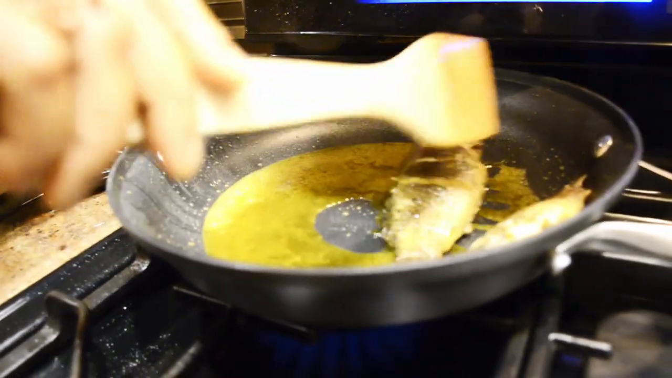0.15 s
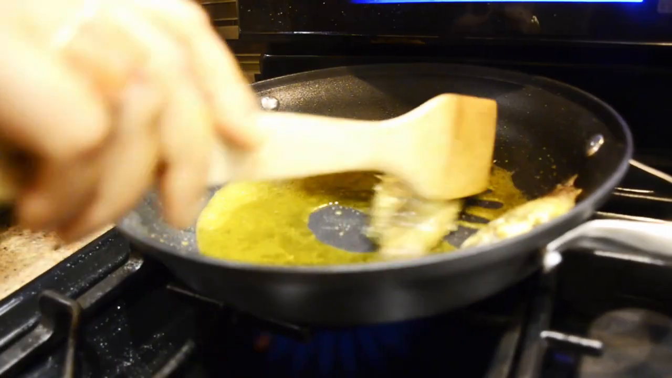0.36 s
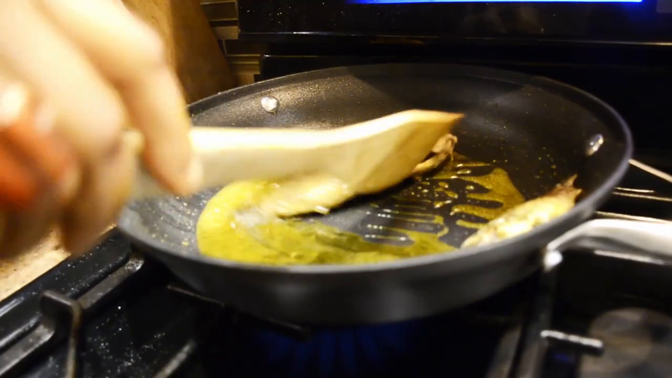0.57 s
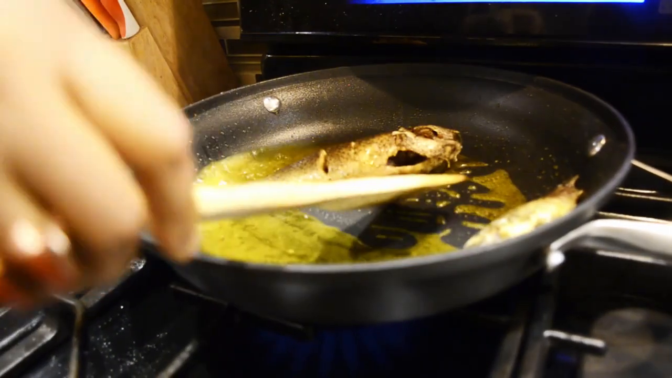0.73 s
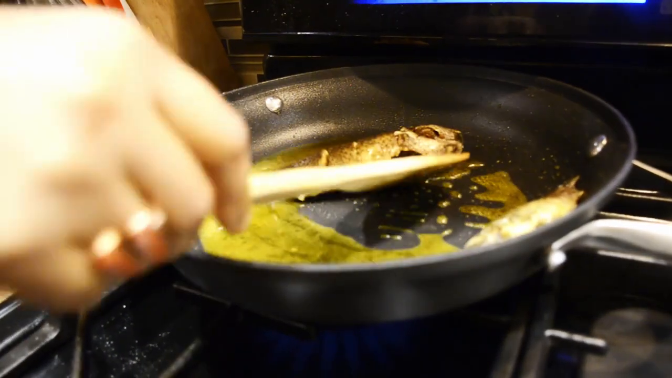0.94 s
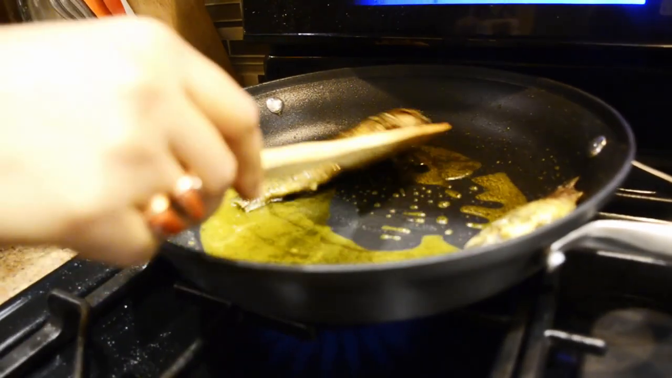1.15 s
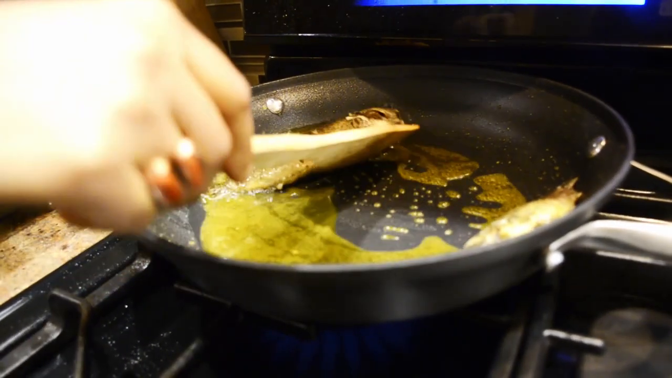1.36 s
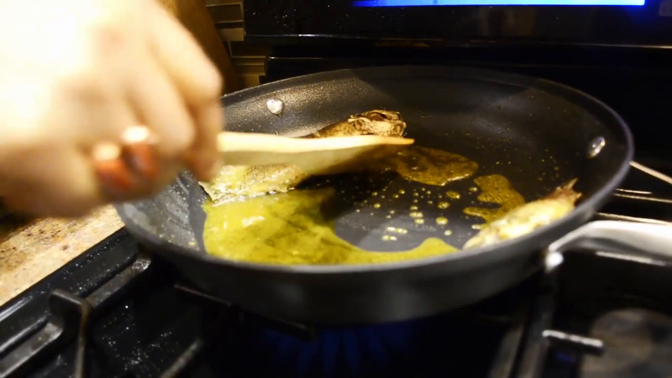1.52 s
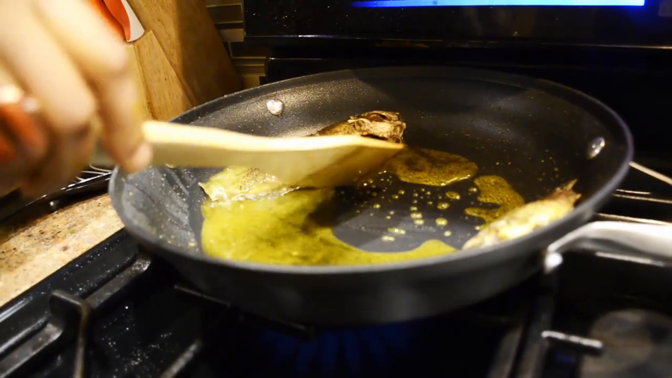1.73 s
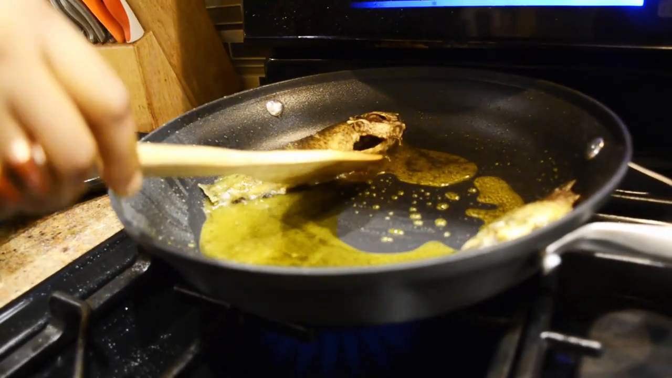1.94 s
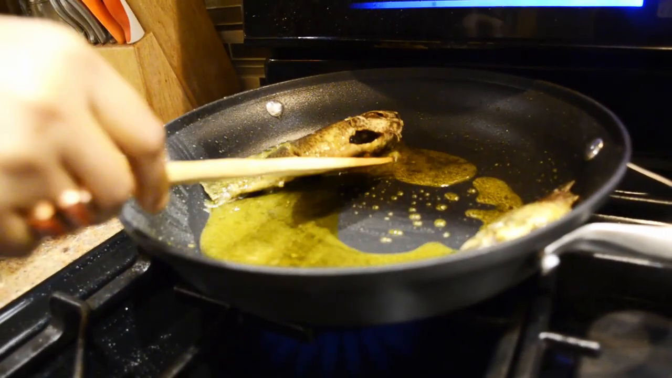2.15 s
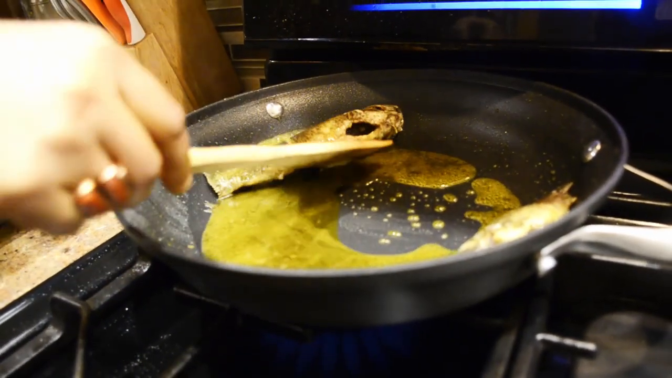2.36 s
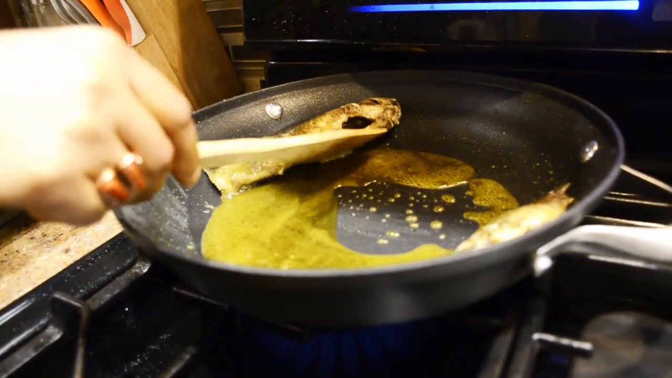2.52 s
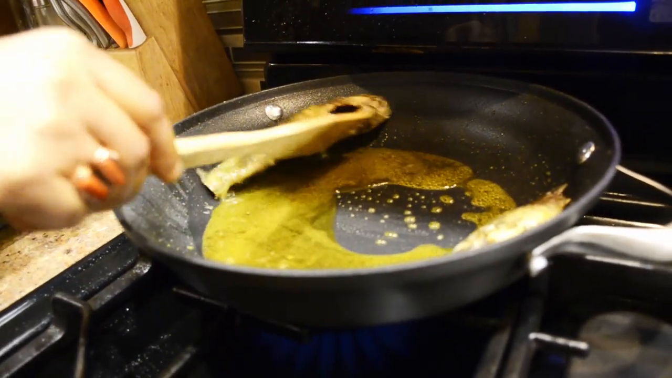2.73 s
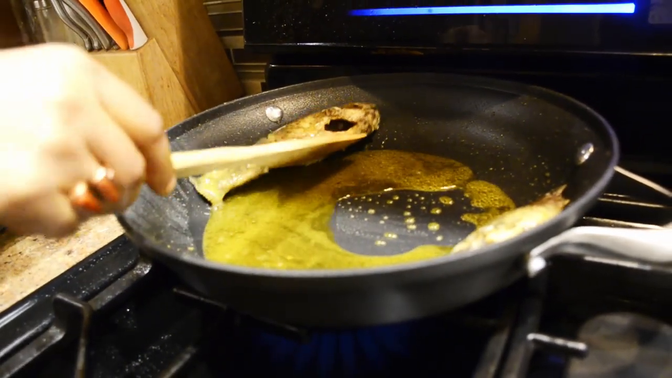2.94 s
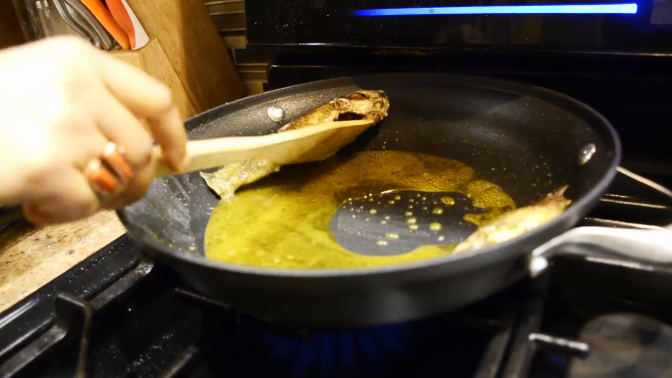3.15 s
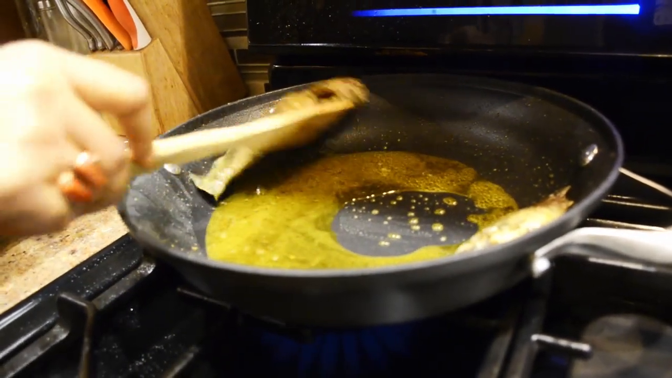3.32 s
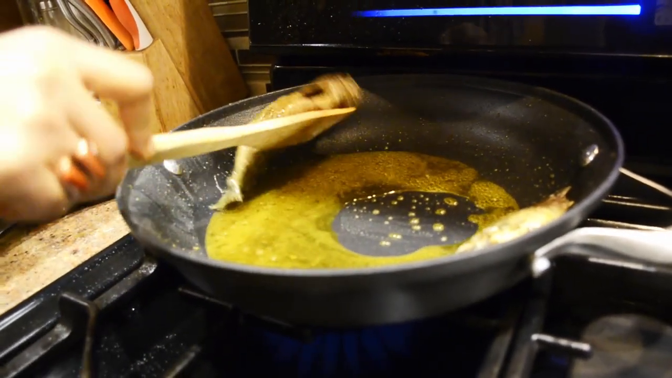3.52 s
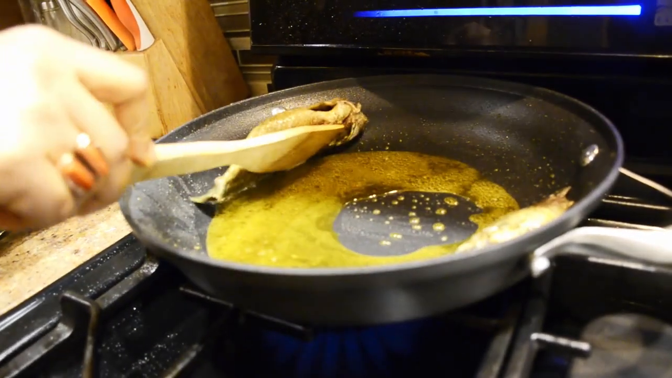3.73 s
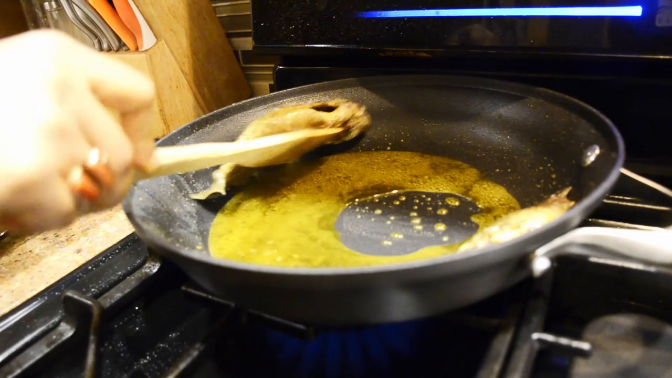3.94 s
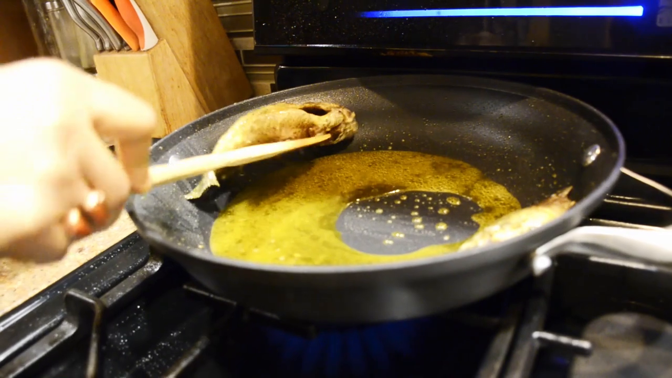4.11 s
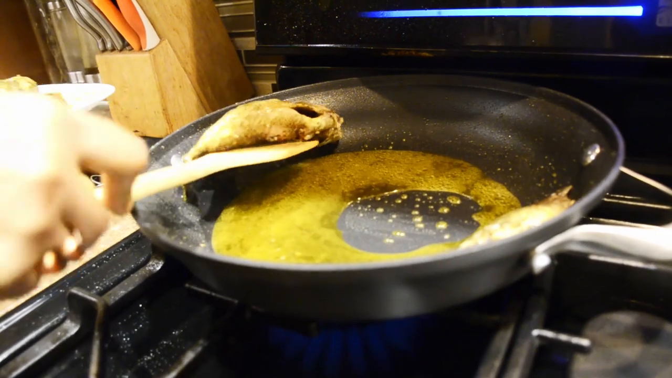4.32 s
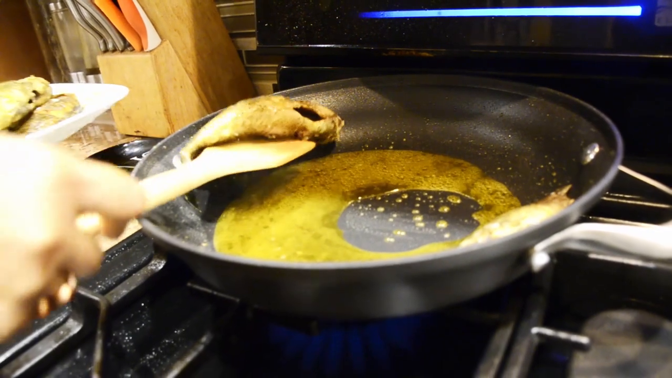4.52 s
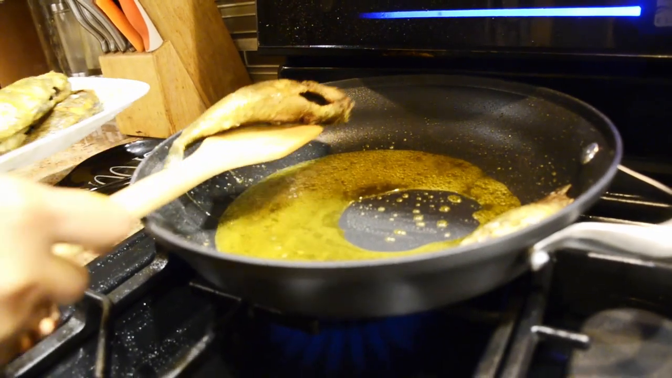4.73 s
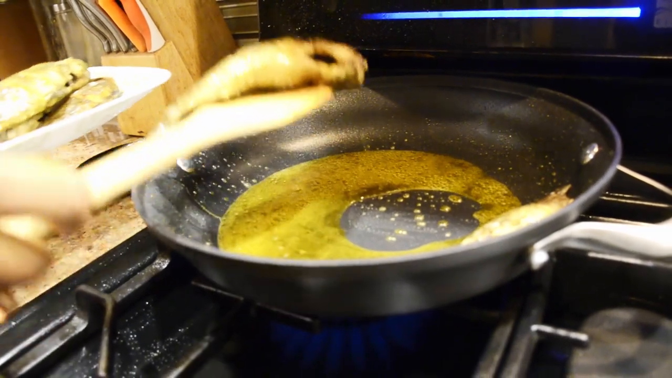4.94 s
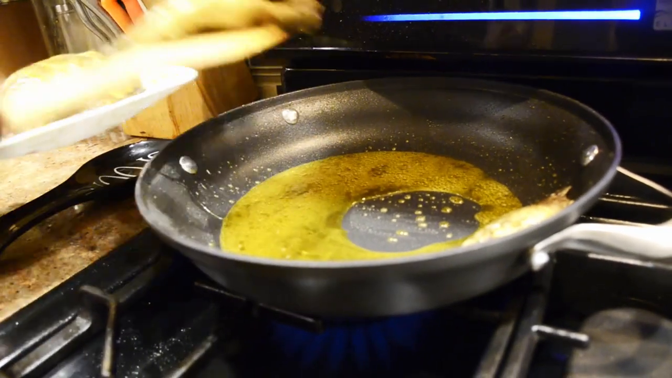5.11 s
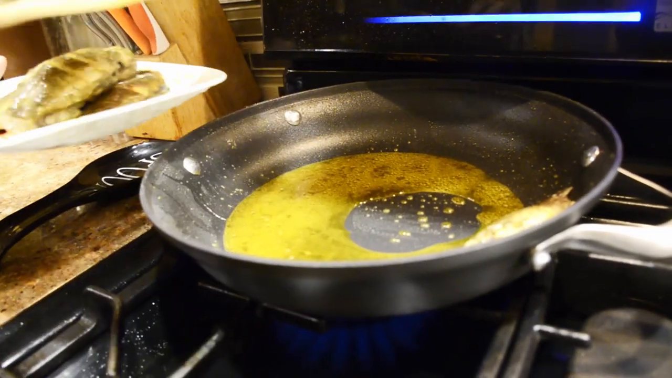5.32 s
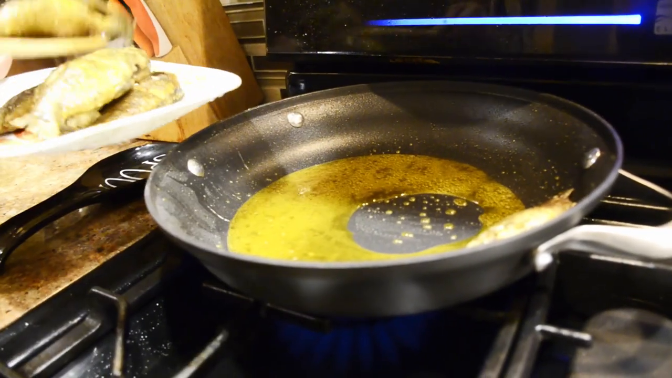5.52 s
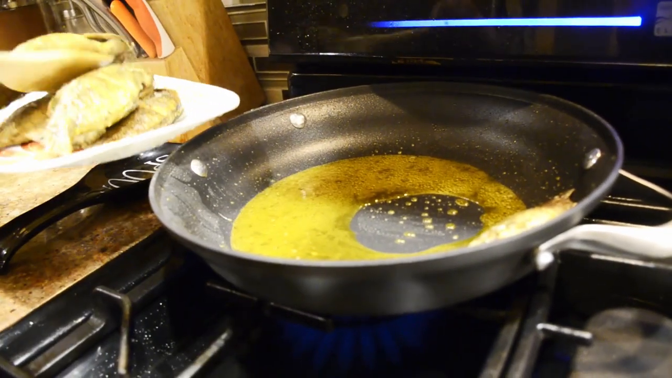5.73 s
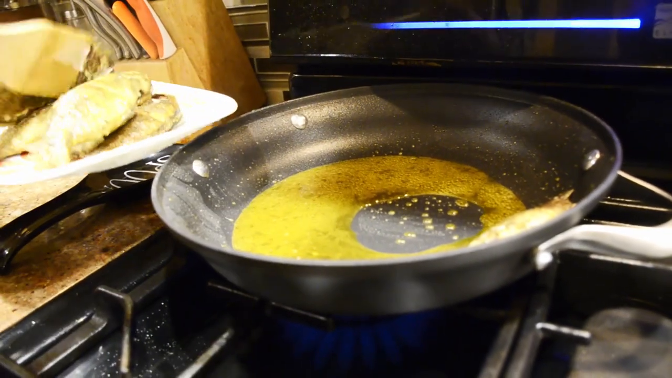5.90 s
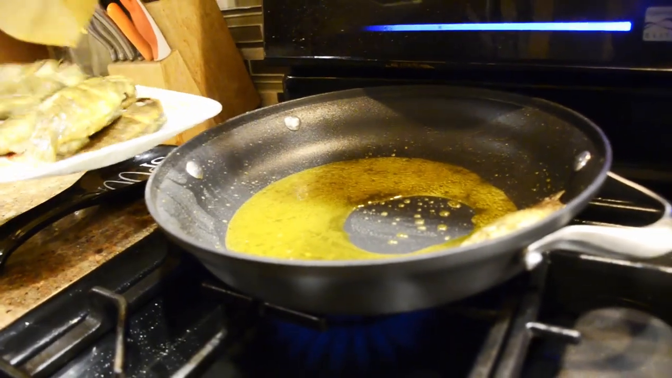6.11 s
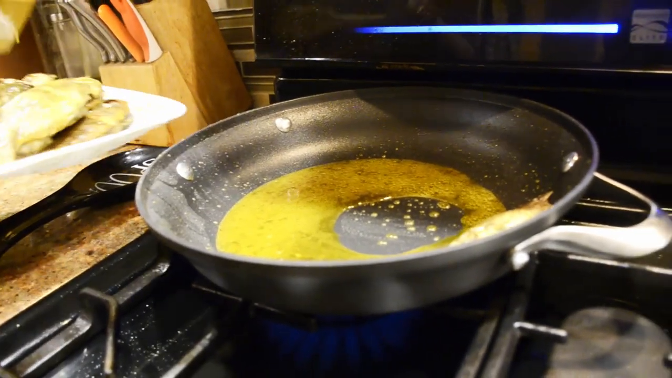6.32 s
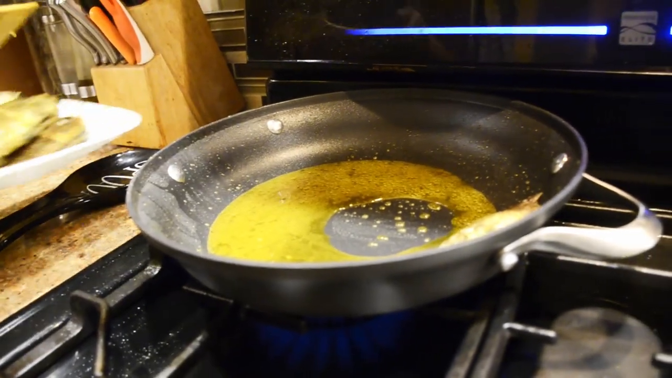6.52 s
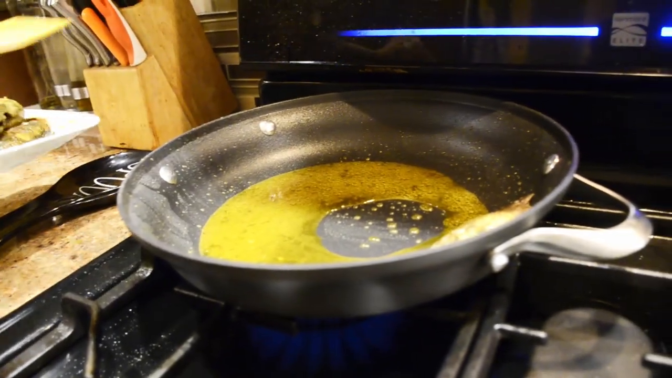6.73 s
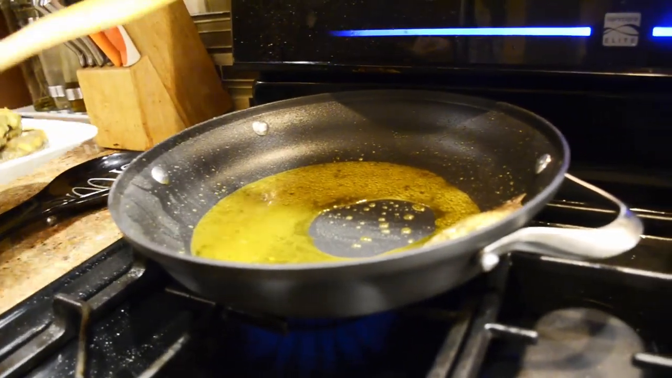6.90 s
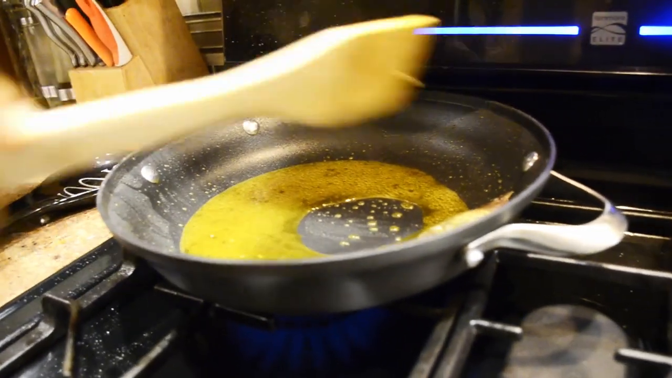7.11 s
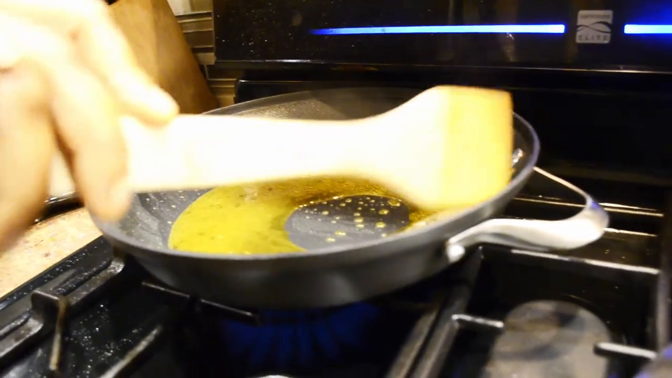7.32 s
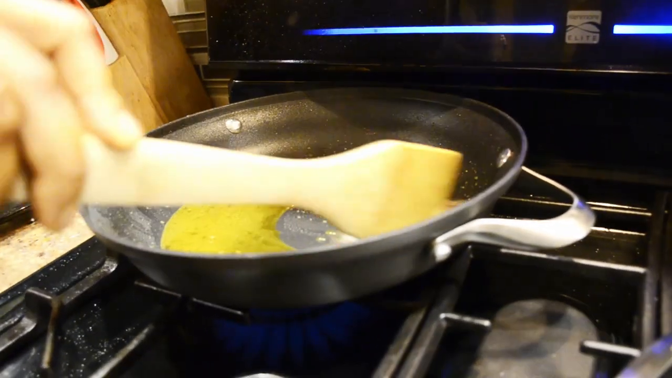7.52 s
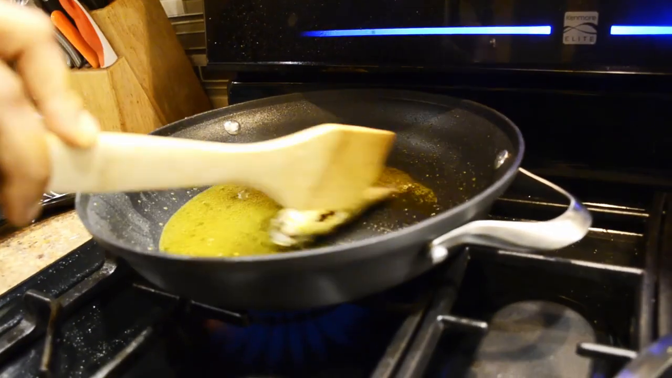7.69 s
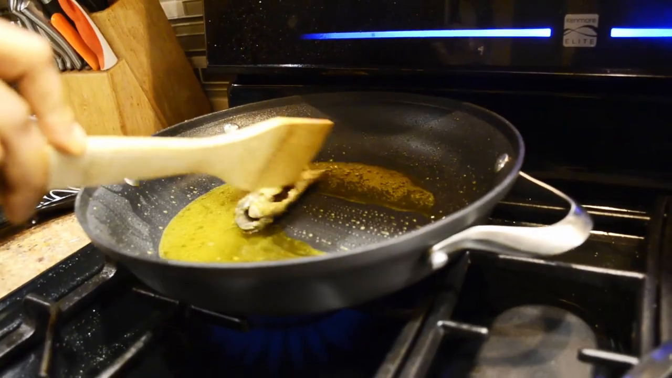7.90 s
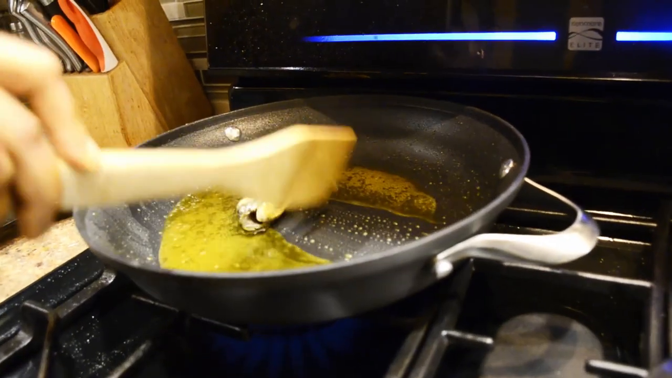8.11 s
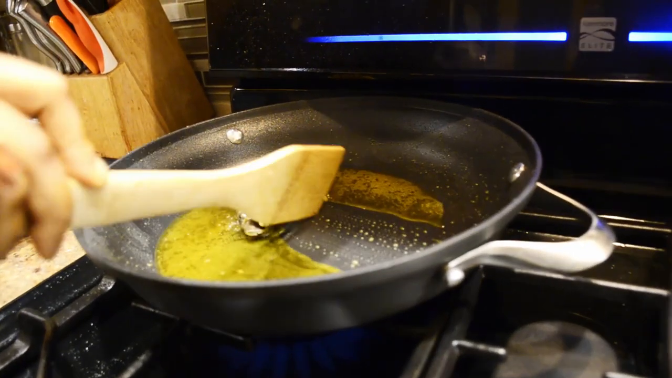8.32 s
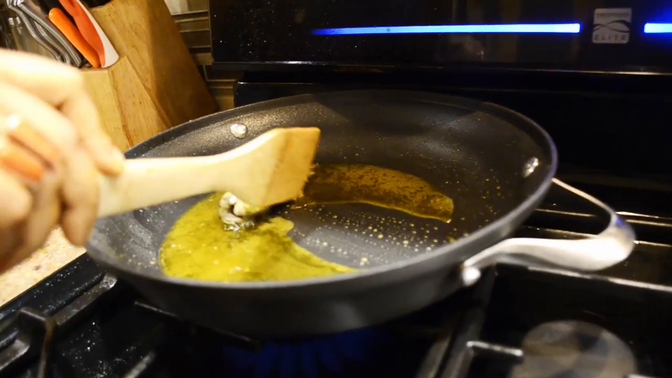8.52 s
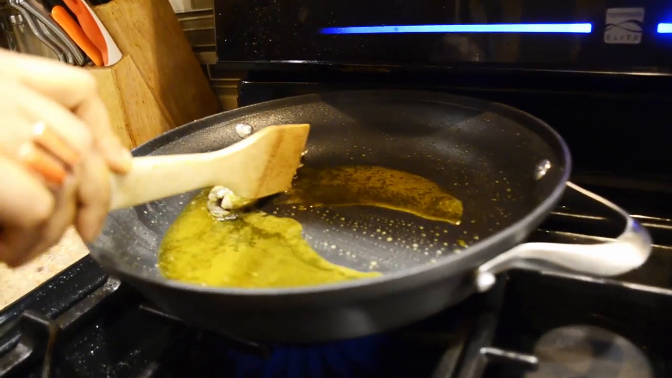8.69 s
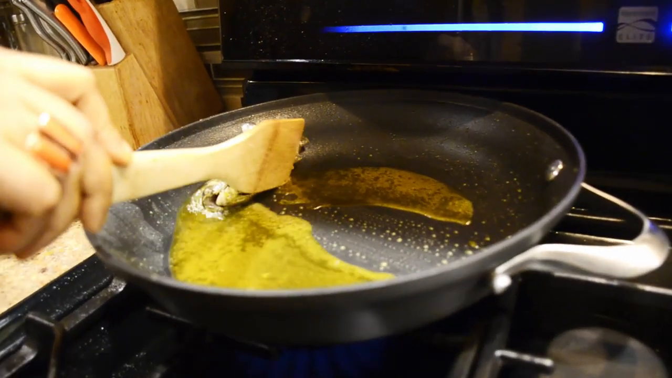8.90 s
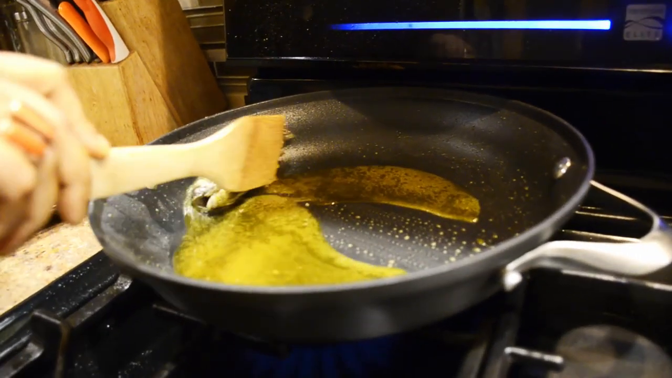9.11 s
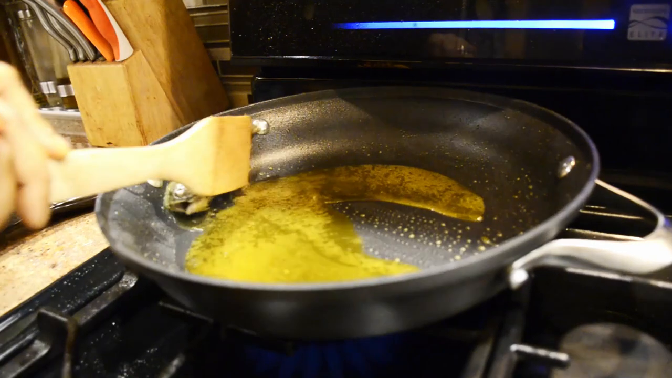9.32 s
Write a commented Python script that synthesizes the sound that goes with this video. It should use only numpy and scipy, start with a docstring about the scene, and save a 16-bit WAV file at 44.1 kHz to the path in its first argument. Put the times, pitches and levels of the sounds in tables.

```python
"""A small kitchen, heard from close by: fish fries in shallow oil in a metal pan over a gas flame.
Steam bubbles burst in swarms: random clicks and noise set resonators of many pitches ringing.
Larger bubbles pop singly as short tones with a spit of noise, and water droplets crack as bright clicks.
Touches and scrapes of a wooden spatula, and a bursting bubble, ring the pan's modes by small slips;
every burst makes the pan hum. Shaped noise is the low roar of the flame, a tail of echoes the room."""
import sys
import numpy as np
from scipy import signal
from scipy.fft import rfft, irfft
from scipy.io import wavfile
from scipy.ndimage import uniform_filter1d

SR = 44100
rng = np.random.default_rng(int(sys.argv[2]) if len(sys.argv) > 2 else 0)


def to_wav(sig):
    """Store sig (one row per channel, or 1-D mono) as 16-bit WAV at the path in sys.argv[1].

    Samples outside -1..1 are clipped; the rate is SR.
    """
    pcm = np.clip(np.atleast_2d(sig), -1, 1) * 32767
    pcm = np.round(pcm).astype(np.int16)
    wavfile.write(sys.argv[1], SR, pcm.T)  # frames by channels


def gain_from_decibels(decibels):
    """Convert decibel values to linear amplitude factors."""
    exponent = np.asarray(decibels, float) / 20
    return 10 ** exponent


N = 412335

# How the frying goes. Each row: time in seconds, vigour in dB, large bubbles over small ones in dB,
# fine spray thrown up in dB.
FRYING = [(0, -21.5, -4, -2), (.26, -24.5, -0.5, 1.5), (.5, -23, -5, -5), (.76, -19.5, -4, -5),
          (.96, -24.5, -4.5, 1), (1.2, -20, -5.5, -1), (1.48, -18.5, -8, -5.5), (2.1, -18.5, -8, -18),
          (2.4, -18, -6.5, -12), (2.7, -20, -3.5, -24), (3.1, -23, -2, 3.5), (3.6, -23, -1, 3.5),
          (4.05, -22.5, -0.5, 2.5), (4.4, -24.5, 3.5, -2), (4.8, -28, 2, 5), (5.25, -28, 2, 3.5),
          (5.5, -30.5, 1, 1.5), (5.85, -27.5, 0, 1), (6.4, -32.5, 0.5, 4), (6.75, -33.5, 0, -4),
          (7.1, -35.5, 4, 2), (7.37, -31, -4, -4), (7.6, -32.5, 0, 6), (7.97, -26, -6.5, 1),
          (8.3, -27.5, -6.5, 0), (8.55, -20.5, -10, 0), (9.05, -19, -5.5, 3), (9.35, -18.5, -7, 1)]
# The ways the pan rings on its grate. Each row: pitch in Hz, strength under a short contact in dB,
# free ring time in seconds (to fall by 60 dB), hum under the sizzle in dB.
PAN_MODES = [(82, 5, 0.069, -57), (122, -8, 0.05, -47), (145.7, 14.5, 0.1, -46.5), (276, 12, 0.044, -43.5),
             (342.5, 9, 0.15, -39), (462.5, 8, 0.17, -38.5), (520, 15, 0.039, -31.5),
             (682, 21, 0.03, -28.5), (894, 10, 0.3, -30), (962, 7, 0.18, -31), (1144, 3, 0.2, -28),
             (1260, 12, 0.079, -26.5), (1376, 16, 0.029, -25), (1600, 10, 0.25, -38),
             (1642, 6, 0.87, -21.5), (1750, 20, 0.11, -19.5), (1974, 12, 0.22, -42), (2137, 7, 0.14, -22.5),
             (2660, 8, 0.18, -25.5)]


def rms_one(x):
    """Scale to unit power."""
    return x / np.sqrt(np.mean(x ** 2) + 1e-20)


def in_time(rows):
    """Draw the columns of a table as curves, read at every sample."""
    s, *columns = np.transpose(rows)
    return [np.interp(np.arange(N) / SR, s, c) for c in columns]


def at_hz(points, hz, column=1):
    """Read a spectrum on a log-frequency axis."""
    points = np.array(points)
    return np.interp(np.log(hz), np.log(points[:, 0]), points[:, column])


def band(x, low_hz, high_hz):
    """Keep a band of frequencies (Butterworth band-pass)."""
    edges_hz = [low_hz, min(high_hz, 0.45 * SR)]
    return signal.sosfilt(signal.butter(2, edges_hz, "band", fs=SR, output="sos"), x)


def drift(rate_hz):
    """Slow random wander of spread 1: coarse noise, one value per 20 samples, smoothed twice."""
    r = np.exp(-40 * np.pi * rate_hz / SR)
    noise = rng.standard_normal(N // 20 + 4002)
    slow = signal.lfilter([1], [1, -2 * r, r * r], noise)[4000:]    # skip the settling
    return np.interp(np.arange(N) / 20, np.arange(len(slow)), rms_one(slow))


def ring(clicks, hz, t60):
    """A resonator: a unit click sets a sine ringing from height 1, falling 60 dB in t60 seconds."""
    r = gain_from_decibels(-60 / (t60 * SR))
    w = 2 * np.pi * hz / SR
    return signal.lfilter([0, np.sin(w)], [1, -2 * r * np.cos(w), r * r], clicks + 1e-18)


def sizzle(size_db, swarm_db, cycles, patch_db, snap_db, snap_share):
    """Bubbles of all sizes burst in swarms and ring a few cycles at the pitch of their size; droplets snap."""
    # Colour of the bursts. Each row: pitch in Hz, strength per Hz in dB (only the shape counts).
    oil_colour = [(120, -57), (200, -91), (422, -38.5), (575, -36), (813, -13), (891, -15), (976, -15.5),
                  (1620, 3), (4590, 5), (5710, 3.5), (6370, 4), (8520, 2), (13200, -25.5), (15600, -80)]
    # How each size of bubble answers. Each row: pitch in Hz, then the dB gained
    # per dB of vigour, per dB of largeness and per dB of spray.
    size_answer = [(604, 2.27, -0.2, 0.01), (2020, 1.72, 1.45, 0.01), (4850, 1.44, 0.12, 0.0092),
                   (8040, 1.4, 0.2, 0.33), (11700, 1.3, 0.27, 0.55)]
    usual_vigour_db, usual_large_db = -23, -3    # the state that the oil colour describes
    level_db = -17.5                             # level in that state
    bursts_per_s = 2100                          # usual rate, before the swarms change it
    fizz_db, fizz_follows = 2.5, 0.36            # a livelier pan merges more bursts into fizz

    usual = np.array([[usual_vigour_db], [usual_large_db], [0]])
    vigour_db, large_db, spray_db = in_time(FRYING) - usual
    vigour_db = vigour_db + flares_db()

    # a patch of water boils off at once
    swarm = gain_from_decibels(swarm_db * (0.65 * drift(12.0) + 1.1 * drift(50.0)))
    sizes = gain_from_decibels(size_db * np.minimum(rng.exponential(1, N), 5))    # mostly small, a few much larger
    sizes = sizes * rng.choice([-1, 1], N)
    chance = rng.random(N) * SR / (bursts_per_s * swarm)
    born = sizes * (chance < 1)
    snaps = rms_one(band(sizes * (chance < snap_share), 1310.0, 6170.0))    # too brief for a pitch

    pitches = np.geomspace(300, 15000, 40)
    many = np.sqrt(pitches)                      # small, high bubbles are more numerous
    dealt = rng.choice(len(pitches), N, p=many / many.sum())
    white = rng.standard_normal((2, N))
    merged = gain_from_decibels(fizz_db + fizz_follows * vigour_db) * swarm ** 0.048
    colour = gain_from_decibels(at_hz(oil_colour, pitches)) * np.sqrt(pitches)

    out = 0
    for k, hz in enumerate(pitches):
        fizz = merged * gain_from_decibels(1.35 * drift(35.0)) * white[k % 2]    # countless tiny bursts merge
        patch = gain_from_decibels(patch_db * drift(45.0))      # one size of bubble sputters for a moment
        bursts = rms_one(born * (dealt == k) * patch + 1e-9) + fizz
        bursts = bursts / np.sqrt(1 + merged ** 2)    # more fizz, but no louder
        rings = rms_one(band(ring(bursts, hz, cycles / hz), hz / 1.226, hz * 1.176))
        answer_db = at_hz(size_answer, hz) * vigour_db
        answer_db = answer_db + at_hz(size_answer, hz, column=2) * large_db
        answer_db = answer_db + at_hz(size_answer, hz, column=3) * spray_db
        out = out + colour[k] * rings * gain_from_decibels(answer_db)
    return gain_from_decibels(level_db) * (out / np.linalg.norm(colour) + gain_from_decibels(snap_db + vigour_db) * snaps)


def flares_db():
    """A pocket of water boils off: the vigour rises for a moment, with soft edges."""
    # Each row: start in seconds, rise of the vigour in dB, length in seconds.
    flare_rows = [(1.272, 4.5, 0.0098), (3.949, 3, 0.017), (4.389, 3, 0.034), (5.139, 3, 0.039),
                  (5.51, 2.5, 0.064), (6.173, 2.5, 0.024), (7.812, 2, 0.028), (7.971, 4, 0.057),
                  (8.08, 1.5, 0.054), (8.17, 4, 0.076), (8.286, 4, .04), (8.336, 3.5, 0.035),
                  (8.495, 1.5, 0.035)]
    edge_s = 0.0043    # half the length of the smoothing
    t = np.arange(N) / SR
    lift = sum(db * ((t > s) & (t < s + length)) for s, db, length in flare_rows)
    return uniform_filter1d(lift.astype(float), max(round(2 * edge_s * SR), 1))


def pan_hum(oil):
    """The bursts shake the pan, which hums at its modes, damped by the oil."""
    hum = 0
    for hz, _, t60, db in PAN_MODES:
        mode = band(ring(oil, hz, 0.3 * t60), hz / 1.106, hz * 1.04)
        hum = hum + gain_from_decibels(db) * rms_one(mode)
    return np.std(oil) * hum


def pops():
    """A large bubble swells, rings while rising a little in pitch and throws a bright spit."""
    # The clearest single bubbles. Each row: start in seconds, tone level in dB (before the last filter),
    # pitch in Hz, length in cycles (the swell peaks after an eighth of it).
    clear_pops = [(0.221, -6.5, 2200, 17), (0.4354, -10.5, 2170, 23), (0.5026, -6, 2020, 13),
                  (0.58, -1.5, 4320, 11), (0.63, -1, 7500, 13), (0.7208, -3, 6610, 14),
                  (0.7432, -2.5, 4500, 18), (1.0355, -11.5, 1860, 16), (1.1593, -6, 4450, 11),
                  (1.514, 1, 4600, 5.5), (1.6387, -7, 2920, 9.2), (1.6582, -10, 4390, 12),
                  (1.7672, -12, 4500, 26), (1.8462, -1.5, 3200, 13), (1.8696, -4, 4420, 13),
                  (2.0174, -1.5, 3130, 7.5), (2.1146, -8, 2600, 15), (2.1361, -7, 3400, 18),
                  (2.2137, 1, 4030, 13), (2.2349, 0.5, 4700, 11), (2.2698, -5, 4530, 11),
                  (2.2904, -4.5, 1650, 6.5), (2.3162, -4, 3350, 18), (2.3865, -4, 3840, 18),
                  (2.5901, 0, 2100, 8.8), (2.7843, -4.5, 3120, 10), (2.8589, -5, 2760, 12),
                  (2.8944, -13, 2470, 7.9), (2.9145, -5, 4150, 18), (2.9532, -27, 4580, 10),
                  (3.0171, -2.5, 2960, 5), (3.1378, -10, 2080, 15), (3.2152, -5, 2610, 9.1),
                  (3.313, 0, 1630, 16), (3.4541, 3, 8210, 9.1), (3.6157, -2, 2140, 7.1),
                  (3.8223, -7.5, 1860, 15), (3.9599, -1, 2720, 9), (4.0762, -10, 1710, 12),
                  (4.1146, -4.5, 2650, 10), (4.2378, -10, 2690, 15), (4.39, -4, 3070, 7.1),
                  (4.4379, -3.5, 2870, 16), (4.5828, -9.5, 2660, 30), (4.6529, -6.5, 2130, 13),
                  (4.7771, -4.5, 3060, 6.8), (4.853, -8.5, 2220, 13), (4.9899, -17, 2320, 11),
                  (5.0188, -17, 2100, 26), (5.0377, -9, 1710, 28), (5.0996, -8.5, 4060, 13),
                  (5.1979, -5, 1810, 15), (5.2767, -6.5, 2700, 4.7), (5.3401, -7.5, 2220, 8.8),
                  (5.383, -11.5, 2080, 12), (5.4553, -19, 2550, 11), (5.5117, -19, 2560, 13),
                  (5.5261, -11, 1750, 36), (5.5601, -15, 2030, 9.9), (5.6414, -12, 3270, 8.6),
                  (5.6618, -19, 2020, 10), (5.6987, -4, 4440, 9.2), (5.7232, -8.5, 1730, 4.3),
                  (5.8075, -7, 4930, 7.8), (5.9906, -17, 2970, 11), (6.0504, -17.5, 2120, 9.6),
                  (6.1652, -22, 4100, 13), (6.1801, -12, 4130, 10), (6.2106, -11, 1990, 9.7),
                  (6.266, -13, 2970, 10), (6.2914, -11.5, 2050, 13), (6.3822, -14, 2880, 13),
                  (6.4181, -21, 1650, 12), (6.4306, -9.5, 5110, 11), (6.4605, -13, 4940, 11),
                  (6.5114, -22, 3700, 11), (6.5348, -9.5, 5070, 13), (6.5797, -11, 8300, 15),
                  (6.6132, -12, 2680, 8.7), (6.6336, -3.5, 4700, 4.3), (6.6556, -11.5, 1710, 19),
                  (6.698, -13.5, 2630, 8.1), (6.8047, -12.5, 1740, 29), (6.8751, -9.5, 2480, 8.4),
                  (6.925, -13, 4790, 11), (6.9519, -19, 2980, 11), (6.9888, -22.5, 2040, 13),
                  (7.0467, -10.5, 3670, 13), (7.109, -11.5, 5400, 18), (7.3633, -14, 4110, 13),
                  (7.5324, -15.5, 4670, 12), (7.8133, -13, 4580, 17), (7.8328, -13, 4800, 14),
                  (7.9285, -22, 4380, 13), (7.9749, -8, 7600, 10), (7.9884, -3, 7470, 14),
                  (8.0133, -7, 3310, 12), (8.0802, -10, 4130, 16), (8.172, -10, 4240, 15),
                  (8.1855, -8, 4850, 15), (8.2304, -9, 4770, 17), (8.2887, -8.5, 4840, 23),
                  (8.3416, -8, 3360, 6.3), (8.3765, -3, 2850, 8.5), (8.4618, -12, 3560, 11),
                  (8.4803, -17, 4780, 13), (8.5042, -4, 5000, 7.6), (8.5312, -6, 4790, 13),
                  (8.6105, -8, 4220, 13), (8.6828, -1, 7550, 13), (8.7113, -2, 4120, 10),
                  (8.8529, -2, 4500, 11), (8.9058, -5, 4690, 12), (9.1034, -9, 2500, 13),
                  (9.2675, 0, 4570, 13)]
    spit_db, spit_spread_db = -4, 3.5    # spit under each pop's tone, and how much chance varies it
    out = np.zeros(N + SR)
    t = np.arange(SR // 25) / SR
    rows = list(clear_pops) + lesser_pops()
    draws = rng.standard_normal((len(rows), len(t) + 1))
    for (s, db, hz, cycles), (luck, *noise) in zip(rows, draws):
        tone = np.sin(2 * np.pi * hz * t * (1 + 0.0025 * np.minimum(hz * t, 12)))
        age = 8 * hz * t / max(cycles, 1)
        swell = age * np.exp(-age)
        tear = 1.53 * np.exp(-np.abs(t - 0.0006) / 0.00006)    # the film tears in an instant
        spray = noise * np.sqrt(t / 0.0013) * np.exp(-t / 0.003)
        spit = band(tear + spray, hz / 1.8, 9700.0)
        pop = tone * swell / swell.max() + gain_from_decibels(spit_db + spit_spread_db * luck) * spit
        out[round(s * SR):][:len(t)] += gain_from_decibels(db) * pop
    return band(out[:N], 920.0, 7100.0)


def lesser_pops():
    """Pops at chance moments and pitches, as strong as the frying is lively."""
    count, cycles = 60, 15
    over_vigour_db, spread_db = 10.5, 3    # level over the vigour, give or take the spread
    low_hz, high_hz = 1600, 6240
    when, pitch, strength = rng.random((count, 3)).T
    vigour_db = in_time(FRYING)[0][(when * N).astype(int)]
    levels_db = vigour_db + over_vigour_db + spread_db * (2 * strength - 1)
    pitches = low_hz * (high_hz / low_hz) ** pitch
    return [(s, db, hz, cycles) for s, db, hz in zip(when * N / SR, levels_db, pitches)]


def cracks():
    """Water droplets crack sharply in the oil: one bright click each, with a wisp of hiss after it."""
    # Each row: start in seconds, level in dB beside the other cracks.
    crack_rows = [(0.5771, -10), (0.631, -16), (0.7228, -16), (1.3314, -12), (1.4047, -8), (1.4296, -10),
                  (1.4815, -9), (1.514, -9), (1.704, 3), (2.0218, -11), (2.2253, -19), (2.2697, -3),
                  (2.3301, -12), (2.4284, -9), (2.56, 4), (2.8005, 1), (2.9891, 1), (3.1378, -5),
                  (3.2535, -16), (3.3343, -11), (3.4565, 4), (3.5399, -18), (3.6237, -26), (3.7246, 4),
                  (3.8018, -7), (3.8931, -7), (3.9285, -1), (3.9549, -7), (4.0582, -8), (4.444, 2),
                  (4.7666, -1), (5.032, -9), (5.6989, 0), (6.2108, 5), (6.2756, -7), (6.4308, -7),
                  (6.5799, -7), (6.6338, -11), (6.667, -2), (7.1092, -23), (7.9748, -3), (8.5067, -5),
                  (8.533, -11), (8.6832, 1), (9.1406, -6)]
    all_db, low_hz, high_hz = -8, 2520, 11400    # all_db is added to every level
    tail_s, tail_db = 0.0018, -13                # fading time of the hiss, its level under the click
    out = np.zeros(N + SR)
    t = np.arange(SR // 50) / SR
    for (s, db), hiss in zip(crack_rows, rng.standard_normal((len(crack_rows), len(t)))):
        click = (t == 0) + gain_from_decibels(tail_db) * hiss * np.exp(-t / tail_s)
        crack = band(band(click, low_hz, high_hz), low_hz / 2, high_hz)
        out[round(s * SR):][:len(t)] += gain_from_decibels(db + all_db) * crack / np.abs(crack).max()
    return out[:N]


def rung_pan(contacts):
    """Each contact is a short run of growing slips that rings the pan modes near its favoured pitch."""
    out = np.zeros(N + SR)
    size = SR // 2
    t = np.arange(size) / SR
    draws = rng.random((len(contacts), 2, size))
    for (s, db, centre_hz, octaves, length, free), (chance, force) in zip(contacts, draws):
        slips = (chance < 1500 / SR) * (t < length)     # about 1500 slips per second
        slips = slips * (2 * force - 1) * (0.5 + 0.6 * t / length)
        slips[0] = 0.5                                  # the onset
        slips = band(slips, centre_hz / 2 ** octaves, centre_hz * 2 ** octaves)    # a soft, broad contact
        hit = 0
        for hz, mode_db, t60, _ in PAN_MODES:
            hit = hit + gain_from_decibels(mode_db) * ring(slips, hz, max(free, 0.02) * t60)
        out[round(s * SR):][:size] += gain_from_decibels(db) * hit / np.abs(hit).max()
    return out[:N]


def short_contacts():
    """Short touches and scrapes of the spatula, and a bursting bubble, ring the pan."""
    # Each row: start in seconds, peak in dB, favoured pitch in Hz, spread to each side in octaves,
    # share of the free ring time.
    short_rows = [(0.208, -8, 2090, .17, 0.23), (0.488, -29, 706, 0.1, 0.74),
                  (0.808, -24.5, 806, 0.23, 0.65), (2.018, -21, 735, 0.17, 1.3),
                  (3.312, -14, 1660, .1, 1.1), (3.599, -27, 310, 1.2, 0.44), (5.277, -17, 1300, 0.94, .1),
                  (7.278, -16.5, 1800, .22, .6), (7.281, -22.5, 915, .2, 1.1), (7.3, -32, 450, .2, 1.3),
                  (7.549, -27, 1650, 0.84, 0.45)]
    contact_s = 0.01
    return rung_pan([(*row, contact_s, free) for *row, free in short_rows])


def spatula_drags():
    """The wooden spatula drags, pressing ever harder on the pan; its pressure damps the ring."""
    # Each row: start in seconds, peak in dB, favoured pitch in Hz, spread to each side in octaves,
    # length in seconds.
    drag_rows = [(0.26, -12.5, 2600, 0.15, .14), (1.228, -5.5, 1600, 0.44, 0.029),
                 (1.238, -18, 666, 0.15, 0.022), (1.282, -19, 520, 0.16, .026),
                 (1.286, -3, 1650, 0.4, 0.017), (1.338, -5, 1700, .6, .012), (1.352, -7, 1210, 1.08, .007),
                 (2.03, -26, 564, .4, 0.046), (2.058, -29.5, 259, 0.11, 0.046),
                 (7.299, -22, 1500, 1.1, 0.096)]
    free = 0.081    # share of the free ring time
    return rung_pan([(*row, free) for row in drag_rows])


def pan_bumps():
    """The pan shifts on its grate: brief low contacts that ring the same modes."""
    # Each row: start in seconds, peak in dB, favoured pitch in Hz, length in seconds.
    bump_rows = [(0.937, -45, 70, .03), (1.403, -33, 124, 0.056), (2.684, -34.5, 115, .012),
                 (3.486, -58, 70, 0.021), (7.29, -35, 151, 0.013)]
    octaves, free = 0.3, 0.77    # spread to each side, share of the free ring time
    return rung_pan([(*row, octaves, length, free) for *row, length in bump_rows])


def flame():
    """Low roar of the burner and the room: noise shaped in pitch, gently fluttering."""
    # Each row: frequency in Hz, strength in dB (only the shape counts).
    roar_colour = [(15, -59), (25, -5), (48, -6), (69, 10), (102, 0), (140, 14.5), (165, 6.5), (184, 9),
                   (271, 8), (401, 12.5), (432, 1), (763, 17), (835, -1), (900, 18.5), (1170, -33),
                   (1980, -120)]
    hz = np.maximum(np.fft.rfftfreq(N, 1 / SR), 1)
    spectrum = rfft(rng.standard_normal(N)) * gain_from_decibels(at_hz(roar_colour, hz))
    level_db = -51.5 + 3.6 * drift(9.9)
    return gain_from_decibels(level_db) * rms_one(irfft(spectrum, N))


def kitchen(x):
    """Hard walls nearby: a dense tail of dying echoes."""
    t60_s, level_db = 0.12, -15
    t = np.arange(SR // 2) / SR
    echoes = rng.standard_normal(len(t)) * gain_from_decibels(-60 * t / t60_s) * (t > 0.002)
    echoes = signal.lfilter([0.6], [1, -0.4], echoes)    # duller than the direct sound
    echoes = echoes / np.sqrt(np.sum(echoes ** 2))
    return gain_from_decibels(level_db) * signal.fftconvolve(x, echoes)[:N]


def scene():
    """Oil, pan and spatula in the kitchen, the flame beneath."""
    single = pops() + cracks()
    contacts = short_contacts() + spatula_drags() + pan_bumps()
    swarms = sizzle(size_db=1.0, swarm_db=3.5, cycles=19.6, patch_db=3.0, snap_db=-12.5, snap_share=0.05)
    oil = swarms + single
    mix = oil + pan_hum(oil) + contacts + kitchen(single + contacts) + flame()
    return mix[None]    # one channel


def roll_off(x):
    """The treble ends steeply here."""
    return signal.sosfilt(signal.butter(12, 15700, fs=SR, output="sos"), x)


def record(dry):
    """The microphone housing cancels a few narrow bands; the highest peaks are rounded."""
    # Hollows in the microphone's response. Each row: centre in Hz, width in Hz, gain at the centre in dB.
    hollow_rows = [(3790, 147, -9.5), (5705, 590, -50.5), (6870, 160, -84), (16100, 450, -14)]
    x = dry
    for hz, width_hz, db in hollow_rows:
        w = 2 * np.pi * hz / SR
        a = np.pi * width_hz / SR
        dip = a * gain_from_decibels(db)
        x = signal.lfilter([1 + dip, -2 * np.cos(w), 1 - dip], [1 + a, -2 * np.cos(w), 1 - a], x)
    mix = 1.484 * np.tanh(x / 1.668)
    return roll_off(mix)


dry = scene()
out = record(dry)
to_wav(out)
```